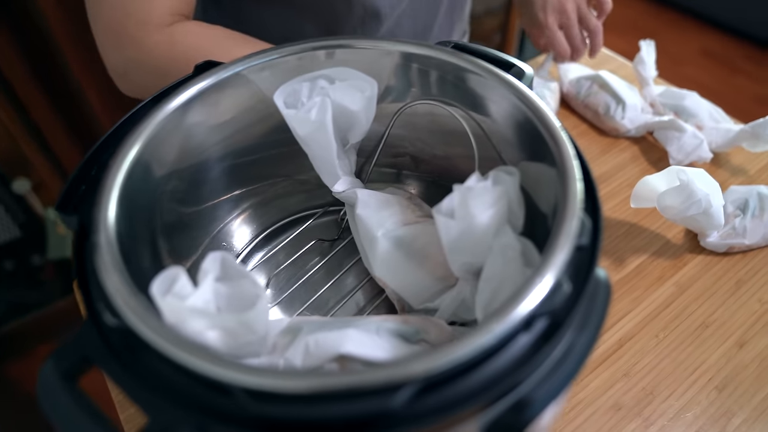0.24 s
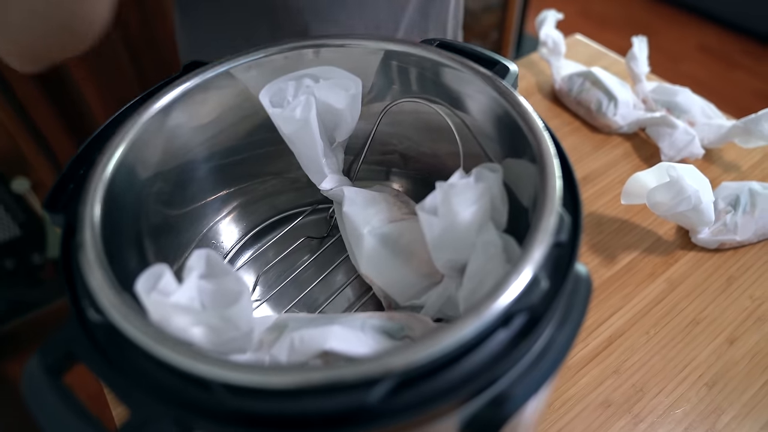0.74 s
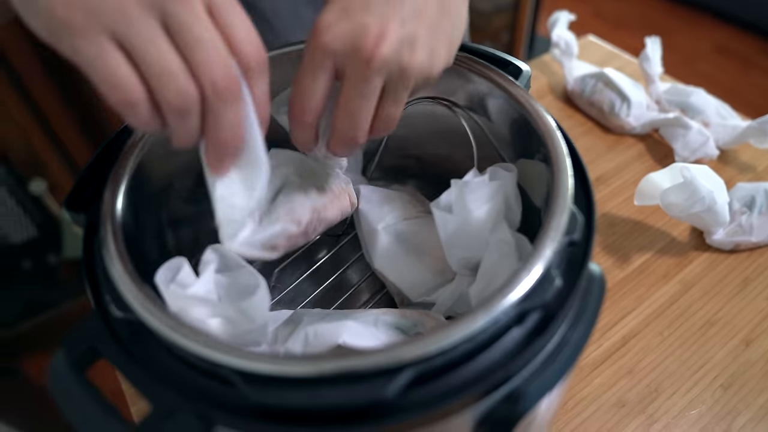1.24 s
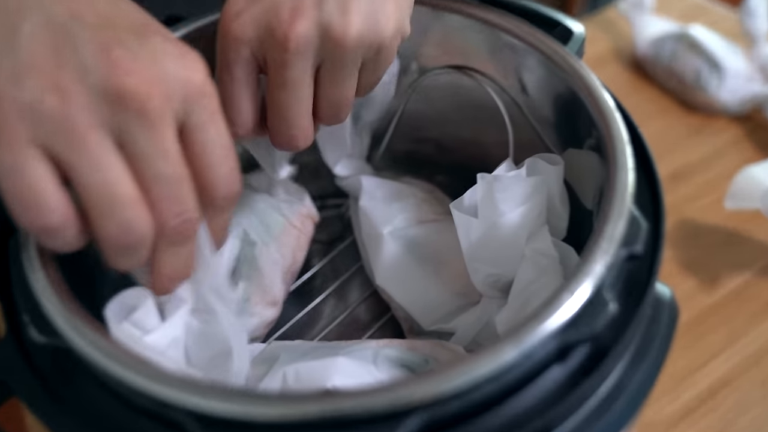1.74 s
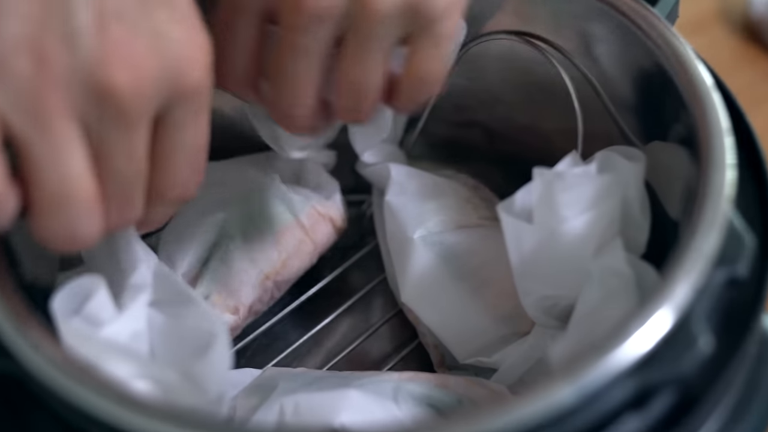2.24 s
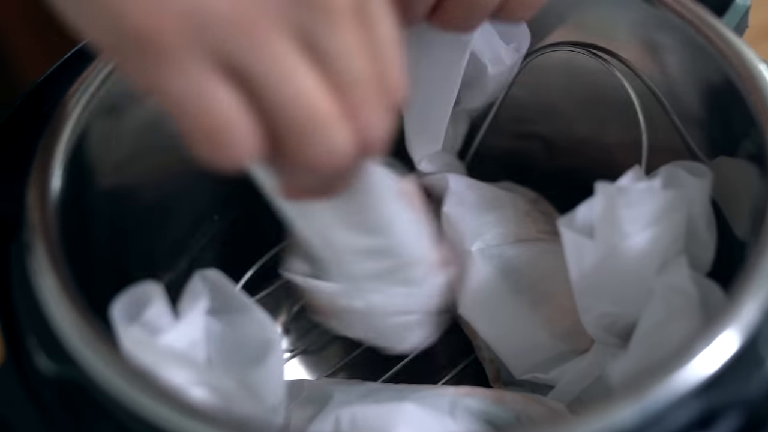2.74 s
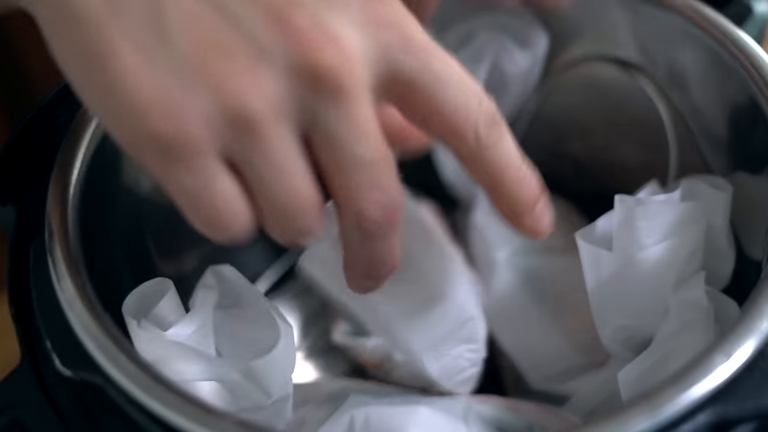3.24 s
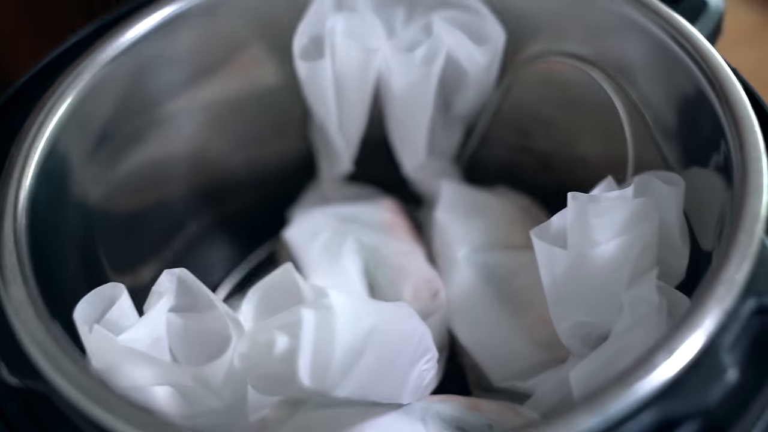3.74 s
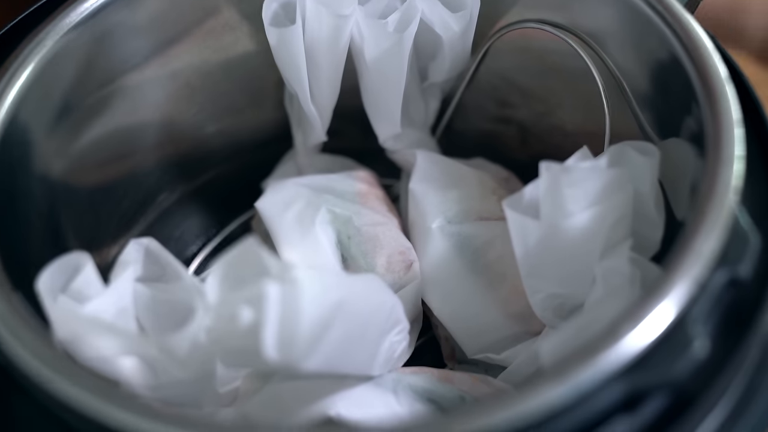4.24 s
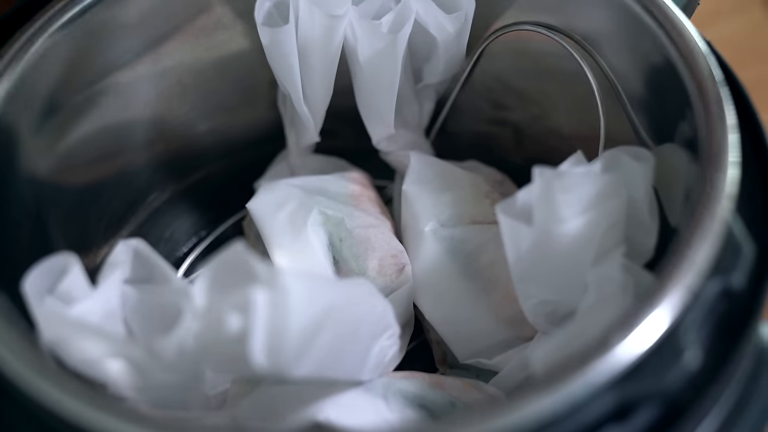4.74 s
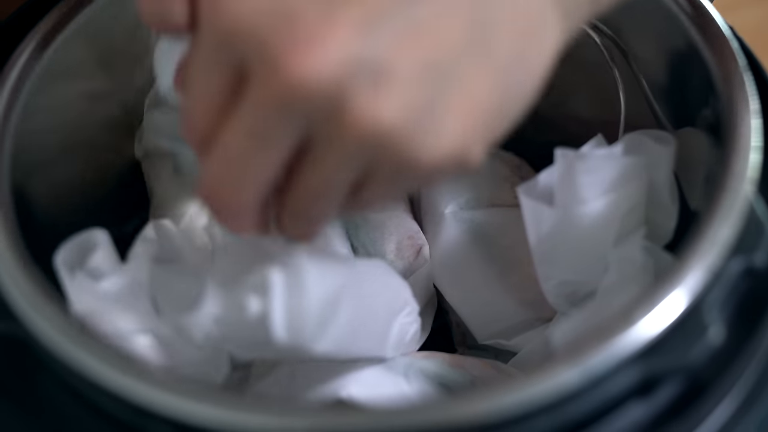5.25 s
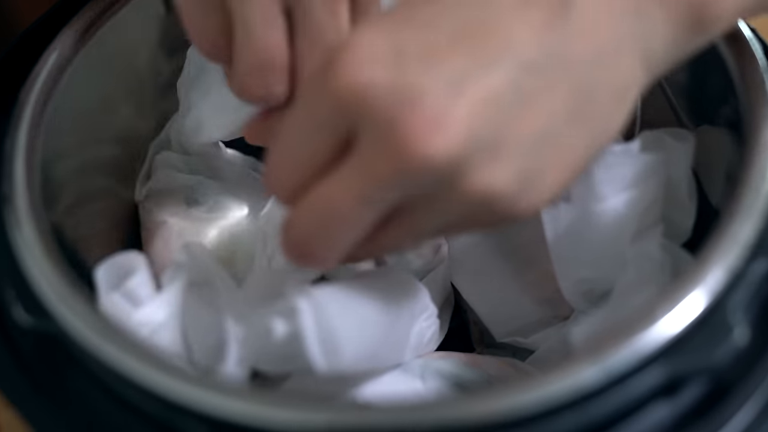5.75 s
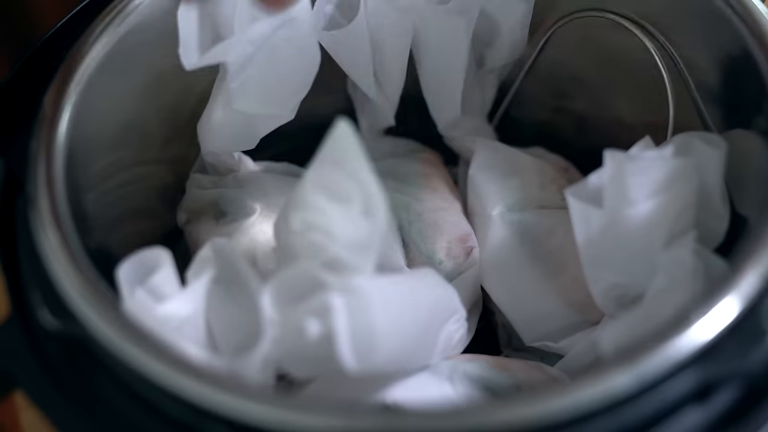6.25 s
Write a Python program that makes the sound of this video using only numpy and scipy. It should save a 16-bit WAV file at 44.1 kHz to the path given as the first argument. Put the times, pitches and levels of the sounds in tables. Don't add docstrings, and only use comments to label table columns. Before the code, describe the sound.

Close to the microphone, stiff parchment crackles and snaps as hands gather a wrapped packet from a wooden counter. The rustle takes on a hollow, low metallic tone as the packet is pressed and turned inside a steel pot. It stops for a moment, then a new packet is picked up crisply and pushed in, with small pops and soft bumps, in a quiet kitchen.

```python
import sys
import numpy as np
from scipy import signal
from scipy.fft import rfft, irfft, next_fast_len
from scipy.io import wavfile
from scipy.ndimage import uniform_filter1d, map_coordinates

SR = 44100
rng = np.random.default_rng(int(sys.argv[2]) if len(sys.argv) > 2 else 0)


def pcm_store(signal):
    levels = np.round(np.clip(np.atleast_2d(signal), -1, 1) * 32767)
    wavfile.write(sys.argv[1], SR, levels.astype(np.int16).T)


def ratio_of_db(decibels):
    return 10 ** (np.asarray(decibels, float) / 20)


N = 286209
HZ = np.fft.rfftfreq(next_fast_len(N + SR // 2), 1 / SR)
TOP_HZ = 15900

# time in seconds, share from 0 to 1.
HANDS_INSIDE = [
    (1.12, 0),
    (1.22, 0.67),
    (3.6, 0.8),
    (3.9, 0),
    (4.95, 0.01),
    (5.1, 0.66),
    (6.15, 0.91),
    (6.3, 0.83),
]
# time in seconds, rustle level in dB,
# fold size in dB (more raises the broad folds and lowers the fine ones).
GRIP = [(0, -36, 3.5), (.5, -71, 2.5), (.9, -38.5, 0), (1.17, -42, 4.5), (1.45, -33, 3.5), (2.0, -49, 0.5),
        (2.25, -42, 0), (2.5, -47, 2.5), (2.9, -39, 3.5), (3.35, -38, 1), (3.5, -56, -4), (3.68, -75, 7.5),
        (3.97, -60, 4), (4.5, -52, 0), (5.0, -39, 0.5), (5.5, -43, 2.5), (6.0, -35, 4.5), (6.32, -76, 1)]
# peak time in seconds, level in dB,
# rise in seconds, fall in seconds (both over 10 dB).
SQUEEZES = [(.06, -30.5, 0.085, 0.084), (.39, -30, 0.15, 0.1), (.65, -31, 0.11, 0.066),
            (1.269, -25.5, 0.061, 0.033), (1.57, -30.5, 0.21, 0.022), (1.678, -26.5, 0.046, 0.13),
            (1.85, -26.5, 0.023, 0.15), (2.02, -29, 0.019, 0.11), (2.291, -30, 0.019, 0.14),
            (2.591, -27, 0.025, 0.024), (2.79, -27, 0.086, 0.032), (3.43, -37, 0.013, 0.015),
            (3.79, -60.5, 0.06, 0.19), (3.989, -38.5, 0.0054, 0.39), (4.087, -31, 0.006, 0.12),
            (4.19, -30.5, 0.023, 0.056), (4.28, -30, 0.024, 0.13), (4.411, -27.5, 0.037, 0.03),
            (4.55, -40, 0.01, 0.022), (4.74, -33, 0.13, 0.066), (5.04, -29, 0.044, 0.041),
            (5.14, -30, 0.016, 0.088), (5.23, -26.5, 0.038, 0.031), (5.35, -33.5, 0.0058, 0.036),
            (5.44, -37, .1, 0.16), (5.529, -27.5, 0.0099, 0.059), (5.68, -26.5, .025, 0.052),
            (5.73, -21.5, 0.022, 0.051), (6.07, -33, 0.3, 0.048), (6.357, -34.5, 0.0029, 0.0061),
            (6.438, -26.5, 0.0096, 0.014), (6.19, -49, .003, 0.045), (6.457, -32.5, 0.0046, 0.025)]
# time in seconds, fine folds in dB.
CRISPNESS = [(0.55, -1.5), (0.7, -6), (0.95, -24), (1.05, 0.5), (1.9, -2.5), (3.3, 1.5), (3.9, -6),
             (4.05, 0), (4.3, 1), (5.1, -0.5), (5.8, -1), (6.3, -4)]

# start in seconds, peak
# level in dB, panel pitch in Hz, broad part in dB relative to the peak.
CREASES = [(0.1281, -22, 1210, 4), (0.2262, -11.5, 1710, -5.5), (0.27, -9, 2190, -12.5),
           (0.3203, -19, 7200, -15), (0.3475, -11, 2146, -1), (0.386, -6.5, 1870, -10), (0.5323, -25, 1420, 3),
           (0.555, -12.5, 1280, -9), (0.6355, -14.5, 7040, -5), (0.651, -10, 3260, -5.5),
           (0.7643, -11, 2080, -12), (0.7833, -10.5, 3760, 0), (0.8124, -17, 5450, -21),
           (0.8538, -13, 2600, -10), (0.9188, -24, 2585, -13), (0.9712, -10, 3080, -17),
           (1.013, -15, 2400, -9.5), (1.0408, -12, 2840, -0.5), (1.0615, -11.5, 2520, -13),
           (1.0866, -15, 6560, -21), (1.1133, -14, 4000, -11), (1.1508, -28, 5340, -19),
           (1.1757, -24, 3400, -20),
           (1.241, -17, 1450, 5), (1.2658, -14.5, 1480, 4.5), (1.3604, -25, 2260, 6.5),
         (1.362, -12, 1960, -13), (1.4497, -13, 3700, -20), (1.4892, -17, 1910, -19),
         (1.5148, -15, 2730, -0.5), (1.554, -14, 2850, -16), (1.6043, -20, 6500, -12),
         (1.6451, -10.5, 1940, -7), (1.6704, -3.5, 2700, -11), (1.757, -9.5, 1460, -6),
         (1.7955, -12, 3930, -1.5), (1.825, -13, 2310, 3), (1.8354, -8.5, 2860, -2.5),
         (1.8573, -10.5, 5700, 0), (1.9318, -11.5, 1540, -15), (1.2555, -19, 5960, 7),
         (2.015, -12, 5530, -15), (2.0796, -12, 5300, -42), (2.1747, -30, 3140, -6),
         (2.203, -17.5, 5600, -3.5), (2.266, -12.5, 5200, -3.5), (2.3714, -9.5, 2830, -5.5),
         (2.423, -13.5, 5470, -6), (0.761, -20, 2520, -8),
           (2.4482, -13, 3270, -3), (2.4723, -12, 5900, -8.5), (2.505, -20, 5490, -7),
        (2.548, -16.5, 6500, -8), (2.5577, -10.5, 2790, -0.5), (2.5906, -23, 2230, -22),
        (1.7155, -18, 7500, 5), (2.649, -20, 1390, -12), (2.6813, -6, 4750, -7.5), (2.6797, -6, 5640, -8),
        (2.739, -22, 6100, -9), (2.7947, -9, 5930, -7.5), (2.874, -18, 6650, -9), (2.887, -15.5, 1480, -33),
        (2.933, -18, 3000, -7), (2.977, -17, 2140, -24), (3.009, -11, 8420, -22), (6.3425, -49, 3200, -20),
        (3.056, -13, 3170, -33), (3.091, -14, 2830, -27), (3.1373, -13, 2380, -13),
        (3.1942, -15.5, 5600, -3), (3.245, -16.5, 2500, -2.5), (3.272, -9.5, 6200, -4.5),
        (3.308, -14.5, 6160, -2.5), (3.346, -11.5, 5200, -6), (3.5103, -10, 7150, -4),
        (3.4167, -24, 2970, -8), (3.4324, -14.5, 3000, -6), (3.507, -11.5, 7100, -12),
           (3.9835, -32, 1270, 2), (3.9955, -32, 1220, -1), (4.0561, -24, 2330, -20),
             (4.0836, -16.5, 1260, 2), (4.1568, -11, 4400, -3.5), (4.176, -5, 4790, -4),
             (4.2754, -14, 1180, -11), (4.3694, -10, 2540, -28), (4.538, -36, 7250, -5),
             (4.548, -28, 5280, -17), (4.6082, -17.5, 6800, -22), (0.3515, -9, 3600, -1),
             (4.655, -18, 2620, -22), (4.6711, -12, 2520, -13), (4.742, -19, 9100, -23),
             (4.7373, -5, 2280, -25), (4.769, -17, 3040, -13), (4.786, -22, 3350, -15),
             (4.8074, -12.5, 2600, -11), (4.8611, -10, 2800, -14), (4.881, -16, 5900, -23),
             (4.9202, -12, 1340, -27), (4.9564, -3, 2690, -13), (5.7555, -16, 1760, 6),
           (4.9983, -26, 2820, -22), (5.026, -10, 2390, -6), (5.092, -15, 6600, -23),
              (5.137, -14, 1720, -2.5), (5.147, -11, 2200, -3), (5.2268, -5.5, 2330, 4),
              (5.3411, -16.5, 5700, -8), (5.347, -12.5, 4370, -24), (5.4181, -13, 7260, 0.5),
              (5.4428, -19, 1500, -2), (5.5205, -14, 5300, -5), (5.609, -22, 2000, 5.5),
              (5.6733, -18, 3530, -14), (5.692, -17, 1740, -11.5), (5.7253, -20, 8500, -10),
              (5.7248, -5, 3530, -12), (5.822, -21, 2760, -22), (5.891, -26.5, 2120, 4),
              (5.921, -11, 3470, 0.5), (6.007, -7, 1970, -8), (6.045, -9.5, 3220, -9),
              (6.0644, -10.5, 1380, -7), (6.085, -10, 6540, -0.5), (6.1133, -15.5, 5300, -10),
              (6.1842, -11.5, 5980, -3.5), (6.3514, -24, 3220, 0), (6.353, -14.5, 2240, -1.5),
              (6.4303, -12.5, 3450, -0.5), (6.4225, -25, 1480, 4.5),
           (0.035, -24, 1345, -16), (0.0582, -22, 2030, -14), (0.0973, -27, 1260, -9),
                 (0.2915, -17, 4520, -8), (0.419, -18.5, 3350, -23), (0.4902, -17.5, 1550, -11),
                 (0.8724, -31, 4360, -12), (3.5746, -23.5, 1960, -2), (4.1059, -29, 5100, 8),
                 (4.3802, -17, 7050, -13), (4.395, -15, 2660, -2.5), (4.9053, -24, 7850, -25),
                 (4.9641, -11.5, 6500, -7.5), (5.5416, -9, 6360, -14), (6.4607, -11.5, 3230, 0.5)]
# start in seconds, peak
# level in dB, panel pitch in Hz, broad part in dB relative to the peak.
TICKS = [(0.2722, -10, 4400, -16), (0.4807, -23, 3470.0, -19), (0.5612, -16, 6500.0, -7),
         (0.5945, -22, 1210.0, -3), (0.6364, -21, 1710, -12), (0.6518, -11, 4170, -24),
         (0.6991, -25, 3500, -11), (0.7437, -28, 6220.0, -14), (0.7838, -10.5, 3600, -10),
         (0.8129, -16.5, 4510, -23), (0.8291, -23, 2670, -18), (0.9641, -20, 4830, -12),
         (1.0291, -27, 5020.0, -21), (1.0412, -7, 2770, -11), (1.1263, -21, 3810.0, 1),
         (1.14, -29, 3360.0, -7), (1.1515, -21, 5270, -20), (1.1762, -17, 3520, -21),
         (1.268, -7, 1510, -12), (1.2855, -13.5, 1950, -3), (1.3525, -21, 5730.0, -10),
         (1.5731, -14, 9000, -9), (1.6715, -17, 2730, -18), (1.7577, -14, 5340, -14),
         (1.84, -11, 5270, -10), (1.8727, -15, 3700.0, -9), (1.8776, -19, 2900, -17),
         (1.9202, -18, 5790.0, -17), (1.9316, -20, 5550, -15), (1.9973, -28, 5940.0, -16),
         (2.0849, -27, 2930, -17), (2.2063, -21, 6100, -22), (2.3722, -10, 5770, -18),
         (2.398, -17, 6300, -7), (2.4977, -22.5, 5500, -3), (2.5923, -8.5, 5860, -10.5),
         (2.6241, -15, 5680.0, -14), (2.6502, -20, 6850, -10), (2.7497, -18, 6700.0, -16),
         (2.8317, -22, 2730.0, -6), (2.8511, -26, 5280.0, -9), (2.8694, -24, 5490.0, -13),
         (2.9028, -19, 5550, -8), (2.958, -30, 9100, -17), (3.2026, -18, 3200, -21),
         (3.2457, -17, 8650, -8), (3.2811, -16, 6030.0, -7), (3.3236, -23, 2280.0, -15),
              (3.3548, -18, 5300, -13), (3.3845, -28, 7080.0, -16), (3.9368, -38, 3880.0, 1),
              (4.158, -16, 4540, -12), (4.1847, -12.5, 4070.0, -2), (4.1929, -12, 4820.0, -14),
              (4.217, -19, 1980.0, -14), (4.2594, -20, 6800.0, -20), (4.2764, -12.5, 6650, -8.5),
              (4.3624, -23, 2460, -21), (4.3738, -13.5, 9000, -21), (4.4606, -24, 5320.0, -14),
              (4.5382, -27, 7340, -15), (4.6016, -24.5, 2090.0, -2), (4.621, -26, 5770.0, -18),
              (4.6883, -17.5, 2860.0, -1), (4.7037, -20, 2670.0, -13), (4.7312, -11, 2960, -13),
              (4.7522, -14, 2130.0, -13), (4.7696, -16, 3800, -24), (4.786, -14, 3280, -24),
              (4.8451, -20, 2300, -15), (4.877, -20, 5990.0, -21), (4.9213, -12, 7800, -19),
              (4.9324, -21, 4010.0, -7), (4.946, -17, 2860, -19), (4.9649, -13, 8000, -18),
              (4.9696, -18, 3570, -11), (4.9987, -20, 5810.0, -23), (5.084, -20, 3460, -18),
              (5.1481, -14, 2870, -3), (5.2943, -20, 1770.0, 1.5), (5.3905, -16, 3500, -8),
              (5.4185, -22, 7070, -2), (5.61, -24, 5100, 2), (5.6942, -19, 9300, -15),
              (5.824, -16, 2440, -22), (5.8996, -21, 2510, -6), (6.0135, -14, 2260.0, -6),
              (6.1546, -28, 2300.0, -14), (6.3419, -54, 2840.0, -9), (6.4559, -20.5, 2150.0, 6.5),
         (0.3487, -15, 12800, -25), (0.48, -24, 9900, -25), (5.2703, -18, 9000, -20),
               (2.997, -24, 11500, -17)]
# start in seconds, peak level in dB, pitch in Hz.
POPS = [(0.0966, -19, 965), (0.1689, -29, 1240), (0.6151, -29, 860), (0.6593, -20, 880), (0.7524, -32, 870),
        (0.8649, -35, 1090), (0.9532, -33, 1170), (1.5961, -25, 880), (1.7779, -19, 564),
        (2.1431, -28, 910), (2.3305, -21.5, 930), (3.1187, -30, 940), (4.3049, -23.5, 755),
        (5.6095, -25.5, 830), (4.1755, -22, 900)]
# start in seconds, peak level in
# dB, pitch in Hz.
NUDGES = [(0.015, -39.5, 218), (1.251, -55, 279), (1.327, -50, 159), (1.737, -53, 278), (3.903, -59, 258),
          (5.05, -52, 207), (5.209, -45, 268), (5.414, -29.5, 894), (5.448, -32, 876), (5.748, -38, 156),
          (5.751, -40, 282), (5.745, -31, 430)]

# frequency in Hz, level in dB.
BROAD_COLOUR = [(150, -56.5), (300, -8.5), (480, -0.5), (700, 1), (1400, 2.5), (2200, -4), (4500, -16),
                (9000, -66)]
# frequency in Hz, level in dB.
MIDDLE_COLOUR = [(500, -52.5), (1200, -14.5), (2100, 3.5), (3200, 2.5), (5000, -1.5), (7500, -11),
                 (10000, -16), (16000, -40.5)]
# frequency in Hz, level in dB.
FINE_COLOUR = [(3000, -55), (6000, 5.5), (8000, 1.5), (11000, -3.5), (13500, -9), (15700, -15),
               (16400, -52)]
# frequency in Hz, width in Hz, level in dB.
POT_AIR = [(412, 35, 2), (492, 55, -5.5), (755, 120, -9), (928, 75, 2.5), (1480, 160, -10.5)]
# frequency in Hz, width in Hz, level in dB.
POT_BODY = [(150.3, 4.3, -5), (204, 105, -10)]
# frequency in Hz, width in Hz, level in dB.
POT_WALL = [(5350, 1300, 0)]
# frequency in Hz, level in dB.
RUMBLE_COLOUR = [(30, -26), (60, -0.5), (110, 2.5), (200, -5.5), (400, -46)]
# frequency in Hz, level in dB.
HUSH_COLOUR = [(12, -40), (20, -11), (76, -8.5), (200, -2), (778, -7), (2070, -22.5), (4280, -14.5),
               (15900, -38)]
# frequency in Hz, time to fall 60 dB in seconds.
KITCHEN_DECAY = [(300, 0.12), (3000, 0.44), (12000, 0.032)]

BROAD_DB, BROAD_INSIDE_DB, BROAD_PER_DB = -5, 3, -0.2235
FINE_DB, FINE_PER_SIZE, FINE_WANDER_DB = -10, -0.38, 1
PATCH_DB = 1.5
TRAIL_DB, TRAIL_SCATTER_DB = -18, 1
TRAIL_FOLLOWS = 0.6
RUMBLE_DB, SHADE_DB = -66, -10.5
HUSH_DB = -56.5


def unit(x):
    return x / np.sqrt(np.mean(x ** 2) + 1e-20)


def along(points, hz):
    f, v = np.transpose(points)
    return np.interp(np.log(hz + 1), np.log(f + 1), v)


def curves(rows):
    s, *cols = np.transpose(rows)
    return [np.interp(np.arange(N) / SR, s, c) for c in cols]


def wobble(rate):
    knots = rng.standard_normal(int(N * rate / SR) + 4)
    return map_coordinates(knots, [np.arange(N) * rate / SR])


def causal(points):
    cep = irfft(np.log(ratio_of_db(along(points, HZ))))
    half = len(cep) // 2
    cep[1:half] *= 2
    cep[half + 1:] = 0
    return np.exp(rfft(cep))


def resonant(modes):
    total = 0
    for k, (centre, width, db) in enumerate(modes):
        mode = 1j * HZ * width / (centre * centre - HZ * HZ + 1j * HZ * width)
        total = total + (-1) ** k * ratio_of_db(db) * mode
    return total


def filtered(x, response):
    size = 2 * (len(HZ) - 1)
    gain = np.sqrt(np.mean(np.abs(response) ** 2))
    return irfft(rfft(x, size) * response / gain, size)[:N]


def laid(seconds, rows):
    at = np.round(seconds * SR).astype(int)[:, None] + np.arange(rows.shape[1])
    return np.bincount(at.clip(0).ravel(), rows.ravel(), N + SR)[:N]


def effort():
    s, db, rise, fall = np.transpose(SQUEEZES)[:, :, None]
    grid = np.arange(0, N + 64, 64)
    t = grid / SR - s
    shape_db = 10 * np.minimum(t / np.abs(rise), -t / np.abs(fall))
    power = ratio_of_db(2 * (db + shape_db)).sum(0)
    squeezed = np.interp(np.arange(N), grid, power)
    return 10 * np.log10(squeezed + ratio_of_db(2 * curves(GRIP)[0]))


def sheet(broad, middle, fine):
    inside = curves(HANDS_INSIDE)[0].clip(0, 1)
    open_air = filtered(np.sqrt(1 - inside) * broad, causal(BROAD_COLOUR))
    in_pot = filtered(np.sqrt(inside) * broad, resonant(POT_AIR) + 0.11 * causal(BROAD_COLOUR))
    body = ratio_of_db(-19) * filtered(inside * broad, resonant(POT_BODY))
    wall = ratio_of_db(-12) * filtered(inside * middle, resonant(POT_WALL))
    paper = causal(MIDDLE_COLOUR)
    in_step = paper / np.abs(paper) * ratio_of_db(along(FINE_COLOUR, HZ))
    return open_air + in_pot + body + wall + filtered(middle, paper) + filtered(fine, in_step)


def snaps():
    creases = np.array(CREASES)
    s, db, hz, broad_db = creases.T[:, :, None]
    at = (s * SR).astype(int)
    pushed_db = effort()[at] - db + 21.5
    trail_db = TRAIL_DB + TRAIL_FOLLOWS * pushed_db + TRAIL_SCATTER_DB * rng.standard_normal(s.shape)
    fine_db = -12 + 4 * np.log2(hz / 3500) + 0.65 * curves(CRISPNESS)[0][at]
    t = np.arange(2000) / SR
    rise = 1 - np.exp(-t / 0.0003)
    noise = rng.standard_normal((len(s), len(t)))
    lumps = ratio_of_db(3 * np.repeat(rng.standard_normal((len(s), 50)), 40, axis=1))
    crack = rise * ratio_of_db(-60 * t / 0.008) * noise
    crack = ratio_of_db(db - 26) * crack / crack.std(axis=1, keepdims=True)
    slips = ratio_of_db(db + trail_db) * (1 - np.exp(-t / 0.0027)) * lumps * noise
    ring = ratio_of_db(db - 7) * rise * ratio_of_db(-60 * t / (0.0083 + 3 / hz)) * np.sin(2 * np.pi * hz * t)
    start = s[:, 0] + 0.0003
    broad = laid(start, ratio_of_db(broad_db) * (crack + ratio_of_db(1.5 - 60 * t / 0.038) * slips))
    middle = laid(start, ratio_of_db(-7) * crack + ratio_of_db(-60 * t / 0.095) * slips)
    fine_mix = ratio_of_db(4 - 60 * t / 0.01) * crack + ratio_of_db(14.5 - 60 * t / 0.021) * slips
    fine = laid(start, ratio_of_db(fine_db) * fine_mix)
    return sheet(broad, middle, fine) + laid(start, ring)


def crackle():
    level_db, size_db = effort(), curves(GRIP)[1]
    broad_db = BROAD_DB + size_db + BROAD_INSIDE_DB * curves(HANDS_INSIDE)[0] + BROAD_PER_DB * (level_db + 40)
    fine_db = FINE_DB + FINE_PER_SIZE * size_db + FINE_WANDER_DB * wobble(3) + curves(CRISPNESS)[0]
    tiny = folds(count=16000, spread_db=2.3, cycles=7, smooth_db=-2)
    rustle = ratio_of_db(level_db - 2) * patchy(tiny)
    return sheet(ratio_of_db(broad_db) * rustle, rustle, ratio_of_db(fine_db) * rustle)


def folds(count, spread_db, cycles, smooth_db):
    draw, t = rng.random((count, 4)), np.arange(160) / SR
    size = ratio_of_db(-spread_db * np.log(1 - 0.99 * draw[:, 1:2]))
    hz = 500 + 15500 * draw[:, 2:3]
    life = np.minimum(cycles / hz, 0.006) + 0.0015
    tone = np.sin(2 * np.pi * (hz * t + draw[:, 3:]))
    bursts = size * ratio_of_db(-60 * t / life) / np.sqrt(life) * tone
    clumps = ratio_of_db(0.18 * wobble(31) + 1.97 * wobble(70))
    friction = ratio_of_db(smooth_db) * rng.standard_normal(N)
    return unit(clumps * (unit(laid(draw[:, 0] * N / SR, bursts)) + friction))


def patchy(x):
    z = signal.stft(x, nperseg=256)[2]
    field = uniform_filter1d(rng.standard_normal(z.shape), size=12, axis=0)
    field = uniform_filter1d(field, size=14, axis=1)
    return unit(signal.istft(z * ratio_of_db(PATCH_DB * unit(field)), nperseg=256)[1][:N])


def ticks():
    s, db, hz, broad_db = np.array(TICKS).T[:, :, None]
    t = np.arange(400) / SR
    noise = rng.standard_normal((len(s), len(t)))
    crack = (1 - np.exp(-t / 0.0002)) * ratio_of_db(-60 * t / 0.0055) * noise
    crack = ratio_of_db(db - 17.5) * crack / crack.std(axis=1, keepdims=True)
    fade = (1 - np.exp(-t / 0.00037)) * ratio_of_db(-60 * t / (0.0083 + 4 / hz))
    ring = ratio_of_db(db - 3) * fade * np.sin(2 * np.pi * hz * t)
    fine_db = -12 + 4 * np.log2(hz / 3500)
    start = s[:, 0]
    broad = laid(start, ratio_of_db(broad_db + 3) * crack)
    middle = laid(start, ratio_of_db(-6.5) * crack)
    fine = laid(start, ratio_of_db(fine_db - 1) * crack)
    return sheet(broad, middle, fine) + laid(start, ring)


def pops():
    s, db, hz = np.transpose(POPS)[:, :, None]
    t = np.arange(900) / SR
    fade = ratio_of_db(db + 4.5 - 60 * t / 0.015) * (1 - np.exp(-t / 0.00088))
    return laid(s[:, 0], fade * np.sin(2 * np.pi * hz * t))


def nudges():
    s, db, hz = np.transpose(NUDGES)[:, :, None]
    t = np.arange(9000) / SR
    u = t / (0.0026 + 2.9 / hz)
    hum = np.sin(2 * np.pi * (hz * t + rng.random(hz.shape)))
    pressure = ratio_of_db(3.5 * wobble(45))
    return pressure * laid(s[:, 0], ratio_of_db(db) * u * np.exp(1 - u) * hum)


def kitchen(x):
    step, answer = SR // 4, np.zeros(N + SR)
    for start in range(0, N, step):
        hz, t, z = signal.stft(rng.standard_normal(SR // 2), SR, nperseg=256)
        fade = ratio_of_db(-60 * t / along(KITCHEN_DECAY, hz)[:, None])
        tail = signal.istft(z * fade, SR, nperseg=256)[1]
        part = signal.fftconvolve(x[start:start + step], tail / np.linalg.norm(tail))
        answer[start:start + len(part)] += part
    return np.pad(answer, (200, 0))[:N]


def rumble():
    shake = filtered(rng.standard_normal(N), ratio_of_db(along(RUMBLE_COLOUR, HZ)))
    return ratio_of_db(RUMBLE_DB + SHADE_DB * curves(HANDS_INSIDE)[0] + 2.5 * wobble(8.1)) * shake


def hush():
    air = filtered(rng.standard_normal(N), ratio_of_db(along(HUSH_COLOUR, HZ)))
    return ratio_of_db(HUSH_DB + 0.57 * wobble(22)) * air


def scene():
    paper = snaps() + crackle() + ticks() + pops()
    room = ratio_of_db(-12.5) * kitchen(paper)
    return (paper + room + nudges() + rumble() + hush())[None]


def roll_off(x):
    return signal.sosfilt(signal.butter(12, 16680, fs=SR, output="sos"), x)


def record(dry):
    held = dry / (1 + np.abs(dry / 0.45) ** 4) ** (1 / 4)
    passed = np.fft.rfftfreq(N, 1 / SR) < TOP_HZ
    mix = irfft(rfft(held) * passed, N)
    return roll_off(mix)


dry = scene()
out = record(dry)
pcm_store(out)
```